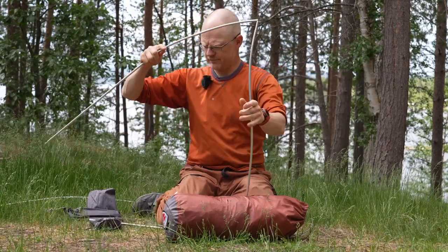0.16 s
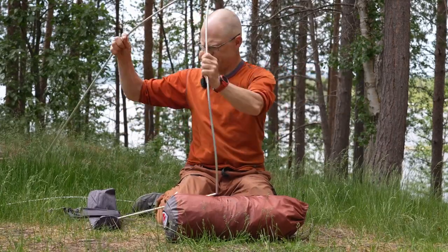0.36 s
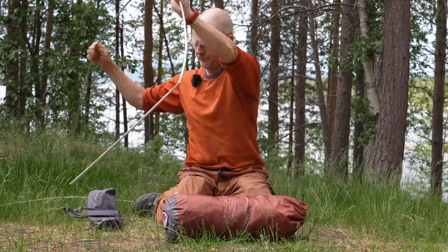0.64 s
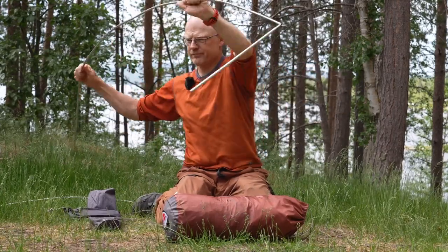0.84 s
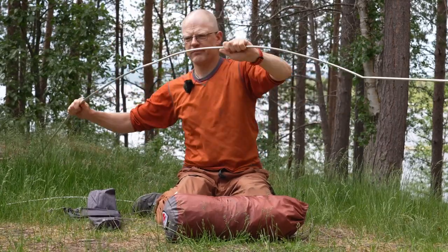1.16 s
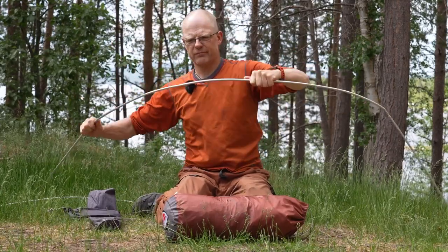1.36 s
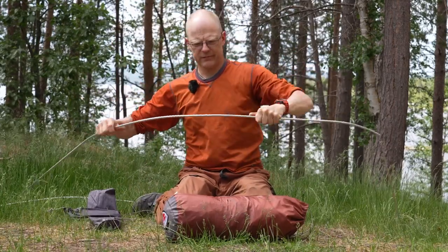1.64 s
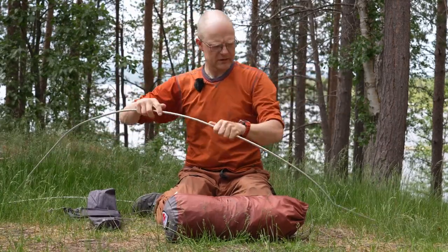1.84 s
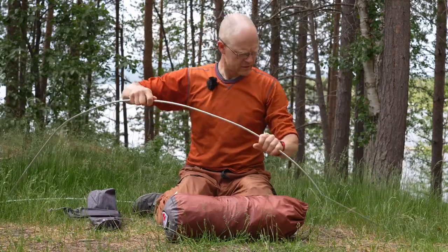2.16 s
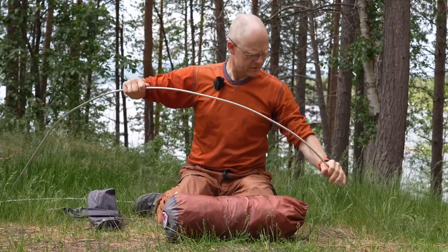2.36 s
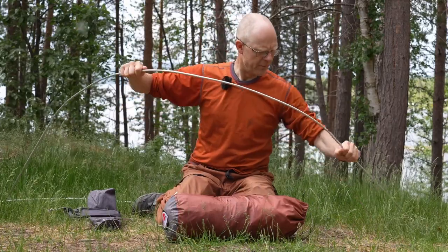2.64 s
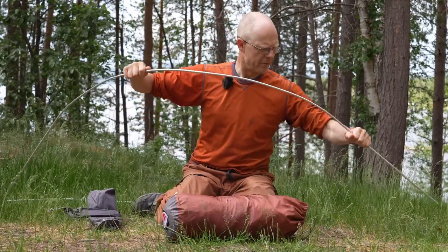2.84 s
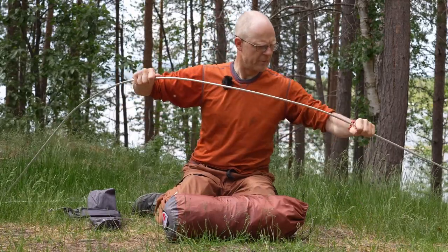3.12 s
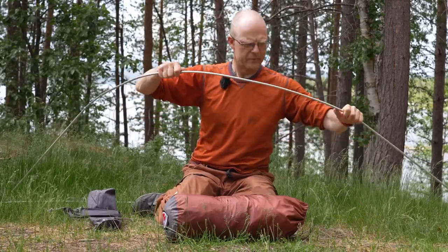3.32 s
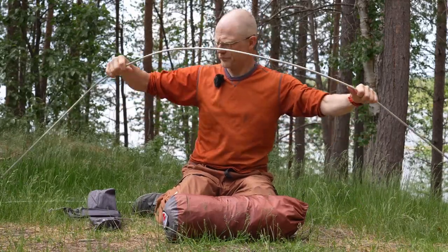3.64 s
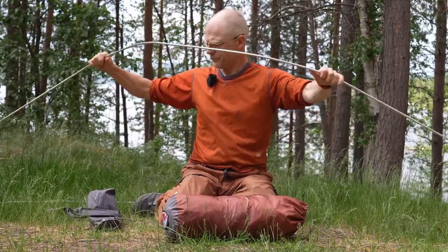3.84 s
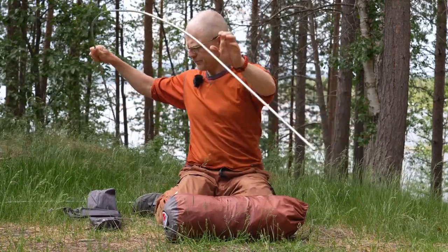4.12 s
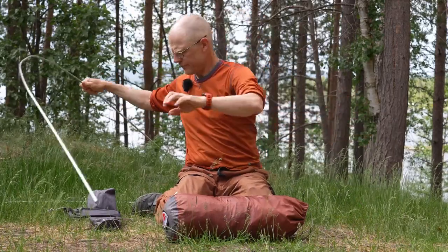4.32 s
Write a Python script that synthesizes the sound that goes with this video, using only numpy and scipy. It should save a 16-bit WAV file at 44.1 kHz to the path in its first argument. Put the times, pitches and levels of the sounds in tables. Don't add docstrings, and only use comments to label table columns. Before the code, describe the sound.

Outdoors among pines, a small chest microphone catches light wind, leaves and a rustling shirt. Thin tent pole tubes click and rattle, an elastic cord chirps, then hard metallic snaps ring briefly. A finch chips, trills and warbles at middle distance, ending in a falling buzz. Later come another sharp snap, sparse ticks and quiet cloth movement.

```python
import sys
import numpy as np
from scipy import signal
from scipy.fft import rfft, irfft, next_fast_len
from scipy.io import wavfile
from scipy.ndimage import uniform_filter1d, map_coordinates

SR = 44100
rng = np.random.default_rng(int(sys.argv[2]) if len(sys.argv) > 2 else 0)


def store_wav(level_fs):
    pcm = np.round(np.clip(np.atleast_2d(level_fs), -1, 1) * 32767)
    wavfile.write(sys.argv[1], SR, pcm.T.astype(np.int16))


def magnitude_from_level(level_db):
    exponent = np.asarray(level_db, float) / 20
    return 10 ** exponent


N = 197612


def unit(x):
    return x / np.sqrt(np.mean(x ** 2) + 1e-20)


def along(points, hz):
    f, v = np.transpose(points)
    return np.interp(np.log(hz + 1), np.log(f + 1), v)


def wobble(rate, size=N):
    return map_coordinates(rng.standard_normal(size=2048), [np.arange(size) * rate / SR], mode="wrap")


def coloured(x, spectrum):
    m = next_fast_len(N + 8192)
    gain = magnitude_from_level(along(spectrum, np.fft.rfftfreq(m, 1 / SR)))
    return unit(irfft(rfft(x, m) * gain, m)[:N])


def trimmed(x, loud=False):
    # f/Hz, level/dB
    quiet_band = [(15850, 0), (15950, -90)]
    loud_band = [(150, -30), (420, 0), (16700, 0), (17000, -90)]
    return coloured(x, loud_band if loud else quiet_band) * np.std(x)


def add(track, s, sound):
    part = track[max(round(s * SR), 0):][:len(sound)]
    part += sound[:len(part)]


def rustle(spectrum, patchy_db, crackle, per_s):
    z = signal.stft(rng.standard_normal(N), nperseg=512)[2]
    field = uniform_filter1d(uniform_filter1d(rng.standard_normal(z.shape), 8, 0), 10, 1)
    hiss = unit(signal.istft(z * magnitude_from_level(patchy_db * unit(field)), nperseg=512)[1][:N])
    ticks = (rng.random(N) < per_s / SR) * np.tanh(rng.standard_normal(N))
    return coloured(hiss + crackle * unit(ticks), spectrum)


def air():
    # t/s, gust at the microphone/dB, breeze in the leaves/dB, body movement/dB
    weather = [(0, -61.5, -57, 5), (.36, -64, -53, 8), (.5, -65, -57.5, 6.5), (.8, -64, -60.5, -0.5),
               (1.2, -68, -61.5, -0.5), (1.7, -67, -61, 3), (2.2, -65, -61.5, 4), (2.6, -68.5, -62, 2.5),
               (3, -64, -61.5, 2), (3.3, -65, -61.5, 0.5), (3.56, -62, -59, 3), (3.75, -66, -60.5, 0),
               (4.19, -63, -57, 2.5), (4.48, -66.5, -60, -1.5)]
    # f/Hz, level/dB
    wind_colour = [(20, -3.5), (40, 4), (65, 0), (110, -1.5), (200, -3), (350, -32.5)]
    leaf_colour = [(100, -31.5), (220, 3), (420, -2.5), (800, -1), (1250, -2.5), (1600, -9), (2500, -23),
                   (5000, -44.5)]
    shirt_colour = [(1200, -7), (2000, 7), (3200, 4.5), (5500, 2), (7000, -0.5), (9000, -17), (13000, -51)]
    hand_colour = [(5000, -33), (8000, -1), (10000, -5), (13000, -7.5), (15600, -8.5), (15900, -63)]
    s, *levels = np.transpose(weather)
    wind_db, leaves_db, moving_db = [np.interp(np.arange(N) / SR, s, v) for v in levels]
    shirt_db, hand_db = moving_db - 68.5, moving_db - 77.5
    wind = magnitude_from_level(wind_db + 1.5 + 1.8 * wobble(6.78))
    wind *= rustle(wind_colour, patchy_db=-0.7, crackle=0.19, per_s=19)
    leaves = magnitude_from_level(leaves_db + 0.02 + 0.91 * wobble(15))
    leaves *= rustle(leaf_colour, patchy_db=0.33, crackle=0.25, per_s=500)
    shirt = magnitude_from_level(shirt_db + 1.7 * wobble(25.0))
    shirt *= rustle(shirt_colour, patchy_db=2.2, crackle=0.25, per_s=900)
    hand = magnitude_from_level(hand_db + 1.1 * wobble(22))
    hand *= rustle(hand_colour, patchy_db=4.0, crackle=.2, per_s=540)
    return wind + leaves + shirt + hand


def strokes():
    rubs = [(0.098, 0.12, 870, 1.9, -52.5), (0.106, 0.017, 7900, 0.42, -43.5),
            (0.404, 0.016, 600, 1.6, -48), (0.247, 0.2, 2780, 0.99, -53.5), (0.45, 0.15, 2950, 0.96, -51.5),
            (0.509, 0.11, 4100, 0.61, -53.5), (0.725, 0.055, 4900, 0.86, -55.5),
            (0.795, 0.11, 5100, 0.5, -60.5), (1.101, 0.066, 6800, 0.5, -66), (1.376, 0.16, 5340, 0.79, -56),
            (1.603, 0.38, 11800, 0.44, -64.5), (0, 0.019, 2480, 1.1, -50.5), (.103, 0.045, 1200, 1.1, -50),
            (.14, 0.068, 900, 1, -54.5), (3.027, 0.036, 8500, .5, -57), (.57, 0.11, 4000, .7, -76),
            (1.919, 0.044, 5930, 0.52, -58), (2.022, 0.41, 11600, 0.5, -65.5),
            (2.202, .3, 7950, .25, -71.5), (2.136, 0.18, 2290, 0.2, -63.5), (2.474, 0.48, 3700, 0.73, -65),
            (2.984, 0.11, 3880, 1.04, -54), (3.506, 0.34, 10400, 0.52, -65),
            (3.947, 0.29, 5600, 0.43, -64.5)]
    out = np.zeros(N)
    for s, length, centre_hz, width, db in rubs:
        size = round(length * SR)
        hz = np.fft.rfftfreq(size, 1 / SR) + 1
        grain_db = 2.6 * wobble(321.0, size=size) + 1.3 * wobble(40.6, size=size)
        grain = rng.standard_normal(SR // 2)[:size] * magnitude_from_level(grain_db)
        band = np.exp(-.5 * (np.log2(hz / centre_hz) / width) ** 2)
        swell = signal.windows.hann(size) ** .8
        add(out, s, magnitude_from_level(db) * unit(irfft(rfft(grain) * band, size)) * swell)
    return out


def contacts():
    # t/s, peak/dB, knock/dB, body/dB, sheen/dB
    snaps = [(.1054, -40, -0.5, -3.5, -9), (.2562, -42, -25, -0.5, -3), (3.1485, -38.5, -30, -2.5, -14),
             (3.1565, -48.5, -28, -2, -5), (.1455, -46.5, -8.5, 5, -4), (1.3148, -45.5, -32, -8, -17),
             (.8281, -55.5, 9.5, 9.5, 1), (2.8475, -46, -33, 1.5, 3), (2.843, -57, -30, -16, 11),
             (3.0375, -59.5, -24, -17, 10), (.1605, -38, -9, -18, -18), (.1687, -39, -19, -6, -1),
             (.7091, -22.5, -22, -9, 6.5), (.7103, -19, -16.5, -9, -5.5), (.84, -44, -26, -9, -17),
             (1.0945, -49, -16, 4, 10), (1.4558, -18.5, -11, -8.5, -13), (1.487, -42, -44, 5.5, -2.5),
             (1.8292, -26, -29, -3.5, -2.5), (1.9692, -36.5, -63, -0.5, -15), (2.982, -34, -37, -15, -5),
             (3.0457, -17, -12.5, -8.5, -12), (3.0553, -32.5, -37, 5.5, 1), (3.8366, -32, -17, 1, 1)]
    rattles = [(.1215, -44.5, 2, -9, -21), (.1472, -35.5, -16, -2, -10), (.575, -49, -6, 7, -40),
               (.7072, -36, -25, -21, -10), (1.0889, -32.5, -22, -28, -9), (1.0912, -32, -23.5, 1, -10),
               (1.8028, -44, -16, 5.5, -19), (1.8595, -37, -41, -3, -7.5), (2.9802, -31, -26.5, -3, -7.5),
               (3.8251, -44, -18, 1, 1)]
    # t/s, peak/dB
    thuds = [
        (.0262, -56),
        (.1364, -51),
        (.4142, -48),
        (3.538, -62),
        (4.1839, -56),
    ]
    ticks = [(.2334, -52.5), (.9782, -57), (1.0843, -56), (1.5245, -44), (1.5469, -47), (1.8552, -47),
             (.5868, -60), (.75, -61), (3.94, -60), (1.808, -50), (1.849, -46), (2.8416, -54),
             (2.8734, -53.5), (2.8886, -50.5), (2.9024, -54.5), (2.9652, -57.5), (3.185, -65)]
    pings = [(.1514, -46), (.8006, -51), (.8905, -47), (1.8195, -42.5), (1.864, -48), (2.5104, -44.5),
             (2.5242, -44), (2.8534, -51), (3.243, -60), (3.5166, -55), (3.6287, -52.5), (3.9647, -48.5),
             (4.0315, -48), (4.0512, -45), (4.463, -53.5)]
    clunks = [(0.15, -56), (0.034, -59), (0.43, -52.5), (5.1, -59), (2.5, -59), (5.5, -55.5)]
    spikes = [(.1912, -49), (.1943, -44), (.198, -47), (.2625, -42), (.2672, -56), (.5935, -56),
              (1.2375, -64), (1.2535, -64), (1.2752, -63), (1.2993, -48.5), (.3249, -40), (1.4815, -57),
              (1.343, -65), (1.3575, -64), (1.4915, -44), (1.5345, -47), (1.558, -53), (1.6222, -56),
              (1.7238, -56), (1.737, -52), (1.7545, -59), (2.558, -52)]
    # knock/dB, body/dB, sheen/dB, t60/s
    kinds = [(thuds, (4, 3, -8, .015)),
             (ticks, (-16, 1, -7, .022)),
             (pings, (-14, -16, -14, .024)),
             (clunks, (-8, 12, -14, .015)),
             (spikes, (-25, -8, -2, .007))]
    rows = [(*row, .015) for row in snaps] + [(*row, .028) for row in rattles]
    for blows, kind in kinds:
        rows += [(*row, *kind) for row in blows]
    return rows


def pole(blows, size=2048):
    # f/Hz, share of a contact's t60
    mode_life = [(350, 0.34), (1000, 0.76), (3200, 1.21), (6000, 0.73), (15000, 0.48)]
    tail_db, tail_life = -14.5, 2.6
    out, t, hz = np.zeros(N), np.arange(size) / SR, np.fft.rfftfreq(size, 1 / SR)
    centres = np.geomspace(350, 15000, 9)[:, None]
    bands = np.exp(-(np.log((hz + 1) / centres) / 0.34) ** 2)
    age = np.clip(t - 0.004 / np.sqrt(centres), 0, None)
    rise = 1 - np.exp(-age / (0.00033 + 0.059 / centres))

    def energy(x):
        return np.linalg.norm(x, axis=1, keepdims=True)

    for s, db, knock_db, body_db, sheen_db, t60 in blows:
        colour = [(200, knock_db + 13.0), (900, knock_db + 16.5), (1900, body_db - 3.0), (3300, body_db + 0.5),
                  (6000, 0.0079), (10500, sheen_db), (15500, sheen_db - 7.5), (16600, sheen_db - 34),
                  (17000, sheen_db - 58)]
        shape = magnitude_from_level(along(colour, hz)) * bands
        life = np.clip(t60, .004, .08) * along(mode_life, centres)
        decay = (magnitude_from_level(-60 * age / life) + magnitude_from_level(tail_db - 60 * age / life / tail_life)) * rise
        chatter = magnitude_from_level(0.88 * wobble(1030, size=size))
        rings = irfft(rfft(rng.standard_normal(size)) * shape, size) * decay * chatter
        rings *= energy(shape) * energy(decay) / energy(rings)
        add(out, s, magnitude_from_level(db - 25.0) * rings.sum(axis=0))
    return out


def trunks(x):
    # f/Hz, t60/s
    echo_life = [(1500, 0.39), (4000, 0.46), (8000, 0.37)]
    hz, t, z = signal.stft(rng.standard_normal(SR // 2), SR, nperseg=256)
    fade = magnitude_from_level(-60 * t / along(echo_life, hz)[:, None])
    tail = signal.istft(z * fade, SR, nperseg=256)[1]
    age = np.arange(len(tail)) / SR
    edge = 1 + .6 * np.exp(-((age - .1) / .035) ** 2)
    lumps = magnitude_from_level(4.5 * wobble(87, size=len(tail)))
    tail *= lumps * (1 - np.exp(-age / 0.0025)) * edge
    return signal.fftconvolve(x, tail / np.linalg.norm(tail))[:N]


def scrape():
    # t/s, length/s, ring f/Hz, width/Hz, level/dB; the last row is a noisy note of the finch
    drags = [(.113, .017, 5700, 900, -47), (.108, .013, 6700, 1100, -42), (.574, .008, 3700, 600, -48),
             (1.36, .1, 7000, 400, -68), (.04, .07, 6000, 600, -66), (.555, .01, 4500, 500, -53),
             (.618, .014, 4900, 700, -65), (2.56, .12, 2900, 400, -71), (2.65, .12, 3100, 350, -70),
             (2.55, .16, 4800, 900, -70), (.566, .02, 5400, 600, -56), (2.74, .11, 5900, 900, -69),
             (2.745, .11, 3350, 300, -61.5), (2.75, .08, 8750, 400, -74), (2.79, .05, 11300, 800, -80),
             (3.42, .22, 5800, 900, -70), (1.932, .016, 6700, 900, -57)]
    out = np.zeros(N)
    for s, length, hz, width_hz, db in drags:
        t = np.arange(round(length * SR)) / SR
        turn = 2 * np.pi * hz * t
        drag = wobble(width_hz, size=len(t)) * np.sin(turn)
        drag += wobble(width_hz, size=len(t)) * np.cos(turn)
        add(out, s, magnitude_from_level(db) * drag * np.sin(np.pi * t / length) ** 0.5)
    return out


def bumps():
    # t/s, peak/dB, f/Hz; the two above 2500 Hz are clunks of the tube
    knocks = [(.1056, -22, 1350), (0.107, -30.5, 453), (0.1216, -24, 805), (0.1385, -28, 590),
              (0.568, -32, 900), (0.139, -49, 70), (0.169, -38.5, 200), (0.409, -28, 254),
              (0.608, -34.5, 320), (0.833, -49, 258), (1.508, -38, 209), (1.56, -40, 242),
              (1.811, -33.5, 226), (1.836, -41.5, 145), (2.0485, -30.5, 2600), (.4985, -30, 2800),
              (2.977, -43, 64), (3.028, -46, 500), (3.12, -41, 40.7), (3.147, -37.5, 85.5),
              (3.181, -37.5, 61.9), (3.537, -35.5, 266), (3.6, -45, 40), (4.06, -38, 360)]
    out = np.zeros(N)
    for s, db, hz in knocks:
        cycles = np.arange(round(4 * SR / hz)) * hz / SR
        push = magnitude_from_level(db - 6.5 - 6.5 * cycles) * (1 - np.exp(-cycles / 0.06))
        add(out, s, push * np.sin(2 * np.pi * cycles))
    return out


def cord():
    # t/s, length/s, first f/Hz, last f/Hz, level/dB
    squeaks = [
        (0.362, 0.065, 3980, 4530, -49),
        (0.389, 0.025, 4450, 5170, -31),
        (0.466, 0.045, 515, 1460, -52),
        (0.508, 0.052, 1900, 2950, -53.5),
        (0.511, 0.04, 3380, 4120, -47),
        (0.524, 0.041, 830, 1615, -53),
    ]
    overtones = [
        [0, -27],
        [0, -27.5],
        [0, -17],
        [0, -4],
        [0, -28],
        [0, -23],
    ]
    roughness = [.015, .004, .025, .014, .02, .04]
    out = np.zeros(N)
    for (s, length, first_hz, last_hz, db), shape, rough in zip(squeaks, overtones, roughness):
        u = np.linspace(0, 1, round(length * SR))
        size = len(u)
        hz = first_hz + (last_hz - first_hz) * u
        gain = magnitude_from_level(db + 28 * rough * np.tanh(wobble(160, size=size))) * np.sin(np.pi * u)
        turn = 2 * np.pi * np.cumsum(hz * (1 + rough * wobble(660, size=size))) / SR
        tone = np.zeros(size)
        for k, part_db in enumerate(shape):
            tone += magnitude_from_level(part_db + 100 * rough * wobble(71.0, size=size)) * np.sin((k + 1) * turn)
        add(out, s, gain * tone)
    return out


def joints():
    # t/s, level/dB, knock f/Hz, knock/dB
    seats = [
        [(.7103, -24.5, 900, -12.5), (0.7112, -25, 1300, -33)],
        [(1.0894, -28.5, 1000, -34), (1.0915, -26, 1100, -26), (1.0936, -36, 1300, -30)],
        [(1.4560, -23.5, 720, -2), (1.4569, -22, 1300, -36), (1.4592, -28, 1300, -28.5)],
        [(3.0456, -22, 1050, -8), (3.0465, -24, 1400, -10), (3.0492, -27.5, 1400, -28)],
    ]
    # f/Hz, width/Hz, level/dB
    joint_a = [(3080, 260, -3), (4920, 150, 2.5), (5540, 350, 9), (6860, 280, 3), (7700, 260, -12),
               (8600, 230, -13), (9720, 1000, -3), (10200, 330, 0), (13400, 260, -19)]
    joint_b = [(1010, 250, -1), (3060, 180, 4.5), (4260, 110, -11), (5050, 85, -9), (6500, 170, 3.5),
               (8770, 80, -13), (11800, 200, -16), (12300, 140, -11), (14900, 120, -28)]
    joint_c = [(680, 760, -24), (3000, 200, 1.5), (4410, 330, 8.5), (5760, 230, -11.5), (7900, 270, 0),
               (9600, 750, 5), (10900, 530, -2), (12300, 240, -22)]
    joint_d = [(2550, 360, 0.5), (3340, 230, -3), (4470, 216, -5), (5400, 180, 7.5), (6220, 190, -1),
               (6900, 200, -21.5), (9300, 450, 3), (11600, 250, -13), (11840, 1100, 0.5)]
    out, t = np.zeros(N), np.arange(1500) / SR
    rise = 1 - np.exp(-t / 0.000077)
    for blows, modes in zip(seats, [joint_a, joint_b, joint_c, joint_d]):
        for s, db, knock_hz, knock_db in blows:
            for hz, width_hz, mode_db in [(knock_hz, 1070, knock_db), *modes]:
                loss = 0.83 * width_hz + 0.027 * hz
                fade = loss / 300 * np.exp(-np.pi * loss * t) * rise
                add(out, s, magnitude_from_level(db + mode_db) * fade * np.sin(2 * np.pi * (hz * t + rng.random())))
    return out


def ring_of_trees(x):
    delay_s, spread_s = 0.061, 0.016
    colour = [(1500, -11), (4000, -5), (7000, -5), (12000, -8.5)]  # f/Hz, level/dB
    age = np.arange(SR // 8) / SR
    puff = coloured(rng.standard_normal(N), colour)[:len(age)]
    puff *= np.exp(-((age - delay_s) / spread_s) ** 2)
    return signal.fftconvolve(x, puff / np.linalg.norm(puff))[:N]


def song():
    # t/s, length/s, first f/Hz, last f/Hz, level/dB
    glides = [
        (0.859, 0.0072, 5800, 6100, -52.5),
        (0.875, 0.026, 5660, 3830, -52.5),
        (0.904, 0.0069, 2800, 5240, -56),
        (1.014, 0.0178, 5330, 3870, -54.5),
        (1.024, 0.012, 3860, 4540, -49.5),
    ]
    # hook t/s, fall t/s, lowest f/Hz, level/dB
    trill = [(1.112, 1.1247, 2940, -46.5), (1.18, 1.2, 3040, -46), (1.258, 1.2754, 3030, -42.5),
             (1.3305, 1.351, 3044, -41.5), (1.407, 1.427, 2740, -40), (1.482, 1.4997, 2890, -40)]
    # t/s, f/Hz, level/dB
    flourish = [
        [(1.559, 2550, -62), (1.57, 2730, -48.5), (1.594, 3030, -42.5), (1.598, 3520, -45), (1.604, 4800, -54),
         (1.615, 5400, -63)],
        [(1.622, 6150, -66), (1.627, 5690, -64), (1.631, 4620, -52), (1.636, 4080, -41), (1.639, 4720, -51),
         (1.6415, 4070, -49), (1.644, 2800, -57)],
        [(1.647, 2470, -58), (1.651, 3540, -43.5), (1.663, 3950, -43), (1.666, 4520, -50), (1.6685, 3600, -44)],
        [(1.668, 3680, -44), (1.67, 3200, -40.5), (1.674, 3580, -44), (1.678, 2720, -41), (1.682, 3280, -50),
         (1.684, 2550, -47), (1.688, 2830, -52), (1.691, 2210, -58), (1.695, 2800, -56)],
    ]
    # t/s, top f/Hz, level/dB
    warble = [(1.767, 3110, -46), (1.790, 3200, -44.5), (1.8115, 3320, -41.5), (1.833, 3080, -45),
              (1.852, 3180, -41), (1.872, 3200, -47), (1.888, 3480, -48), (1.905, 3990, -56),
              (1.921, 3460, -56), (1.94, 3680, -57)]
    edge_db = -11
    notes = list(flourish)

    hook_gap_s, flick_s, fall_s, knee_s = 0.0054, 0.002, .022, 0.00565
    for s, fall, hz, db in trill:
        end = fall - hook_gap_s
        hook_s = [s, s + flick_s, end - flick_s, end]
        hook_db = db - 6.5 + np.array([edge_db, -2, 0, edge_db])
        notes.append(list(zip(hook_s, (3950, 4270, 4380, 4850), hook_db)))
        notes.append([(fall, 1.85 * hz, db - 13.5), (fall + knee_s, 1.33 * hz, db),
                      (fall + 0.807 * fall_s, 1.06 * hz, db), (fall + fall_s, 0.94 * hz, db + edge_db)])

    last_s, breath_s = 0.0165, 0.0028
    spacing = np.append(np.diff(np.transpose(warble)[0]), last_s) - breath_s
    for (s, hz, db), step in zip(warble, spacing):
        notes.append([(s, 0.79 * hz, db + edge_db), (s + 0.297 * step, .975 * hz, db + 3.5),
                      (s + 0.75 * step, hz, db), (s + step, 0.83 * hz, db + edge_db)])

    for s, length, a, b, db in glides:
        notes.append([(s, a, db - 7), (s + 0.39 * length, a * (b / a) ** 0.47, db), (s + length, b, db - 5)])
    return notes


def stretch(rows):
    s, hz, db = np.transpose(rows)
    t = np.arange(s[0], s[-1], 1 / SR)
    gain = magnitude_from_level(np.interp(t, s, db)) * signal.windows.tukey(len(t), .15)
    return s[0], np.interp(t, s, hz), gain


def finch():
    # t/s, f/Hz, level/dB
    buzzes = [
        [(1.915, 3270, -61), (1.94, 3380, -61), (1.965, 3420, -61), (1.995, 3230, -66)],
        [(1.995, 5650, -62), (2.022, 5050, -60), (2.03, 4000, -55), (2.062, 3650, -50), (2.09, 4060, -51.5),
         (2.118, 3950, -53.5), (2.137, 3100, -53), (2.155, 2500, -61), (2.17, 2250, -68)],
    ]
    whistle, buzz = np.zeros(N), np.zeros(N)
    for rows in song():
        s, hz, gain = stretch(rows)
        size = len(hz)
        hz = uniform_filter1d(hz, size=80, mode="nearest") * (1 + .005 * wobble(400, size=size))
        gain = gain * magnitude_from_level(3 * wobble(260, size=size))
        add(whistle, s, gain * np.sin(2 * np.pi * np.cumsum(hz) / SR))
    for rows in buzzes:
        s, hz, gain = stretch(rows)
        size = len(hz)
        turn = 2 * np.pi * np.cumsum(200 + 30 * wobble(120, size=size)) / SR
        chop = 1 + .7 * np.sin(turn + .8)
        hz = hz * (1 + .06 * np.sin(turn) + .028 * wobble(495, size=size))
        add(buzz, s, gain * chop * np.sin(2 * np.pi * np.cumsum(hz) / SR))
    bounce = magnitude_from_level(-15) * np.roll(whistle, round(.0125 * SR))
    return whistle + bounce, buzz


def scene():
    loud_db = -33
    blows = contacts()
    hard = pole([row for row in blows if row[1] > loud_db])
    faint = pole([row for row in blows if row[1] <= loud_db])
    near = faint + scrape() + cord()
    hard = trimmed(hard + joints(), loud=True)
    bird, buzz = finch()
    echoes = magnitude_from_level(-7) * trunks(bird + magnitude_from_level(4) * buzz)
    echoes += magnitude_from_level(-36.5) * trunks(hard + near) + magnitude_from_level(-38.5) * ring_of_trees(hard)
    mono = hard + trimmed(near + bird + buzz + echoes + bumps() + strokes() + air())
    return np.array([mono, mono])


def band_limit(x):
    return signal.sosfilt(signal.butter(12, 17010, fs=SR, output="sos"), x)


def record(dry):
    # f/Hz, level/dB
    stray_colour = [(18, -20), (30, 6), (404, -6), (801, -9), (1040, -19), (3980, -16.5), (5310, -15),
                    (16000, -3.5)]
    level = np.sqrt(np.abs(uniform_filter1d(dry[0] ** 2, size=1024)))
    hiss = coloured(rng.standard_normal(N), stray_colour)
    stray = trimmed(magnitude_from_level(-21.0) * np.minimum(level, magnitude_from_level(-62.0)) * hiss)
    stray = stray + magnitude_from_level(-45.5) * dry[0] * wobble(1900) * np.clip(level / magnitude_from_level(-33.5), 0, 1)
    return band_limit(dry + [stray, -stray])


dry = scene()
out = record(dry)
store_wav(out)
```